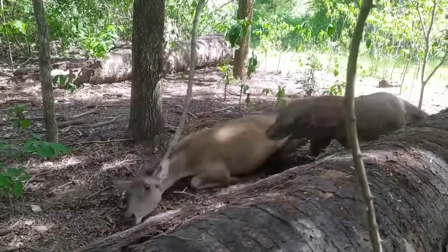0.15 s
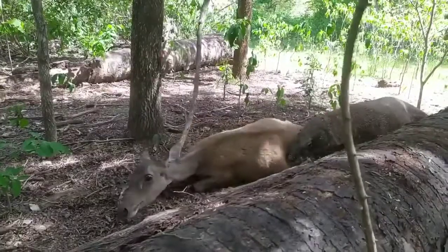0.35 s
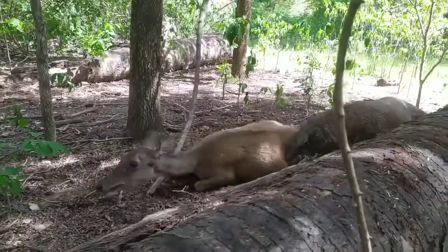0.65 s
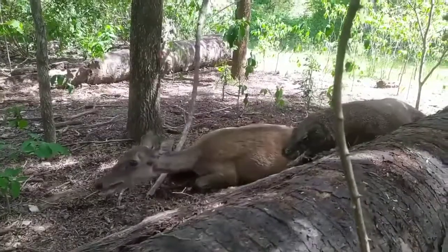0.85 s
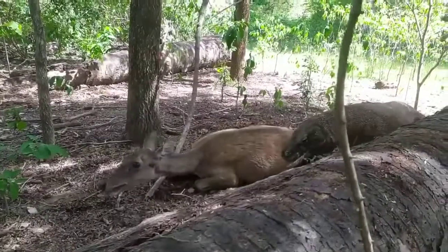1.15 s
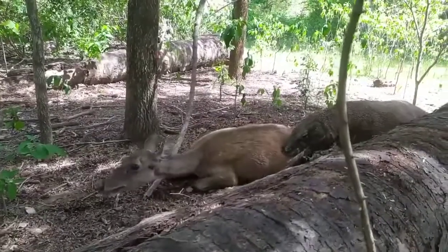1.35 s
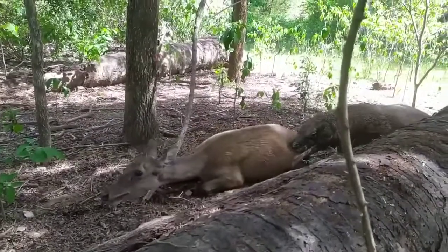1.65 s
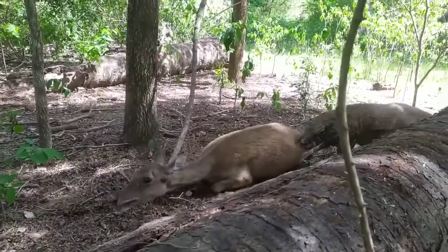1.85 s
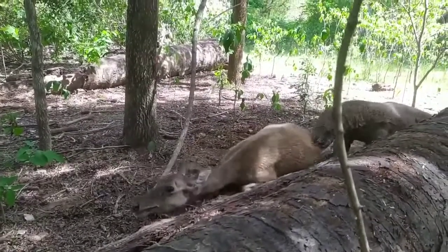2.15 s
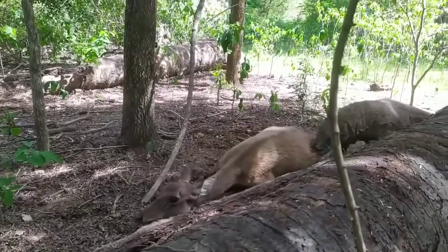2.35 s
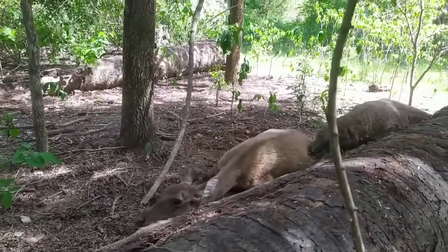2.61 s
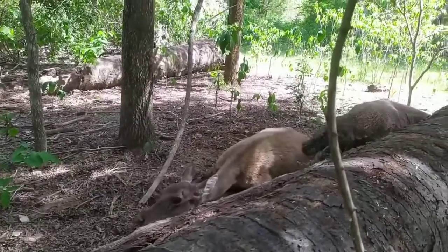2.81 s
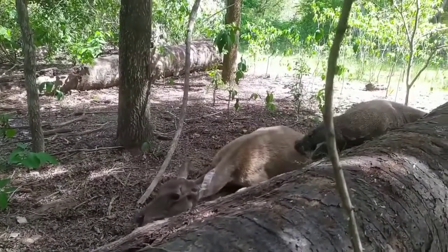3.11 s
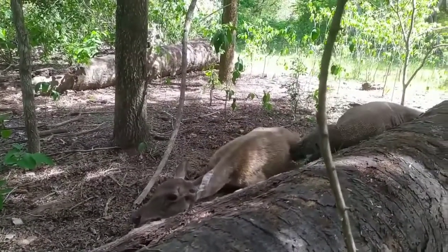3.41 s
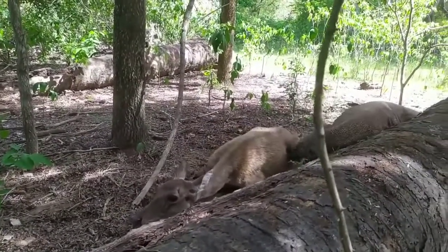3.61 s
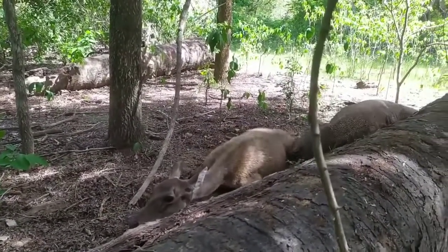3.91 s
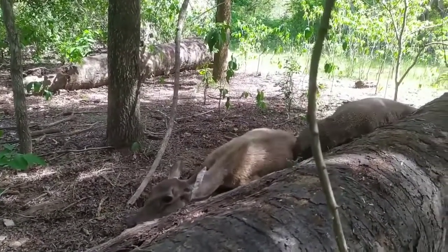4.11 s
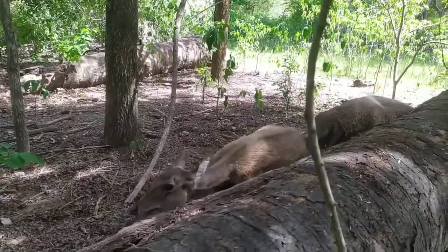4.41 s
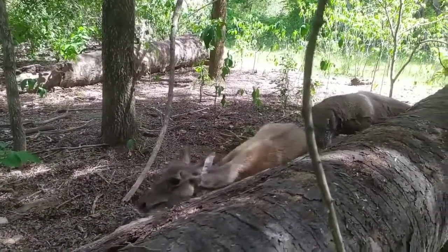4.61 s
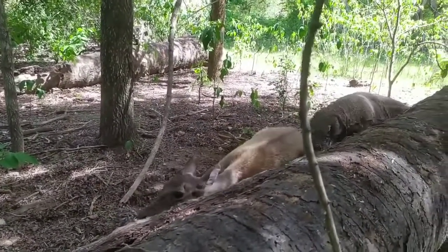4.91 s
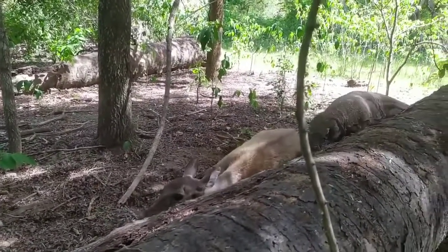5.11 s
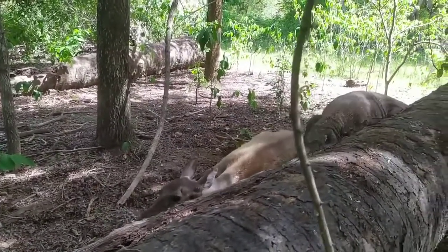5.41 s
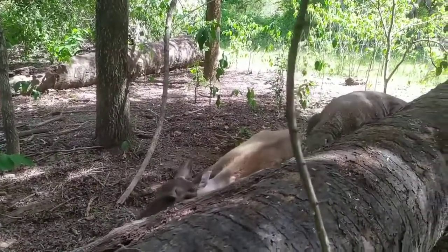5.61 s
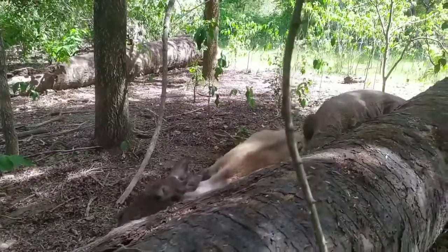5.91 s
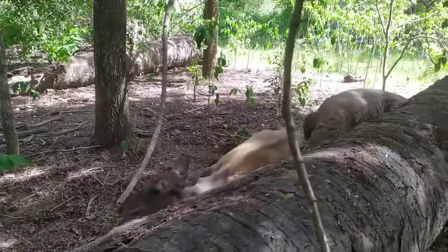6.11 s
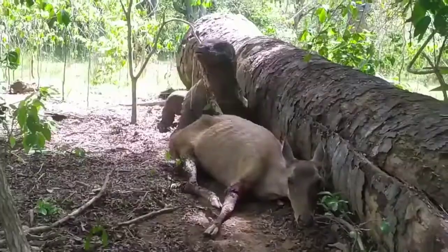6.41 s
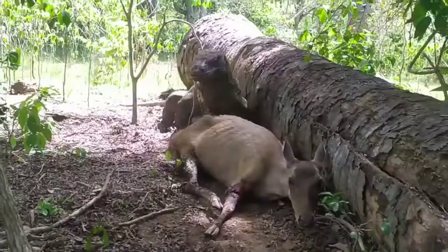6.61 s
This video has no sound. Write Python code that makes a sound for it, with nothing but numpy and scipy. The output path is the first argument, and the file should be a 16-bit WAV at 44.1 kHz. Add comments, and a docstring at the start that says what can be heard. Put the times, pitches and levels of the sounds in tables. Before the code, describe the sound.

A deer bleats once, a growl leaping into a scream and sinking to a rattle, amid leaf rustle, twig snaps and soft thuds in quiet forest.

```python
"""Dry forest: a deer, held down by a large lizard, gives one long bleat, two short grunts and thin wheezes.
The bleat is a pulsed growl, a scream of summed harmonics that leaps in pitch, and a slowing pulsed rattle.
Leaf litter and soil are coloured grainy noise; twigs are noise bursts; thuds are decaying sines and crumbs.
Birds are gliding sines with echoes; a low flutter of throbbing noise and steady air noise lie beneath."""
import sys
import numpy as np
from scipy import signal
from scipy.fft import rfft, irfft, next_fast_len
from scipy.io import wavfile
from scipy.ndimage import uniform_filter1d, map_coordinates

SR = 44100
rng = np.random.default_rng(int(sys.argv[2]) if len(sys.argv) > 2 else 0)


def dump_mix(stems):
    """Bounce the given channels to the path in sys.argv[1] as a 16-bit WAV at rate SR."""
    frames = np.atleast_2d(stems).T  # one column per channel
    limited = np.clip(frames, -1, 1)  # hard clip at full scale
    pcm = np.round(limited * 32767).astype(np.int16)
    wavfile.write(sys.argv[1], SR, pcm)


N = 297675
T = np.arange(N) / SR
CUTOFF_HZ = 15700
PORT_LAG_S = 0.00015
# scream pitch, leaping where the voice breaks: time_s, pitch_hz
SCREAM_PITCH = [(2.565, 374.8), (2.668, 470.7), (2.682, 597), (2.72, 674), (2.772, 748), (2.784, 887),
                (2.81, 966), (2.86, 1057), (2.925, 1081), (2.95, 1107), (3.005, 1132), (3.05, 1114),
                (3.07, 1082), (3.112, 1046), (3.135, 978), (3.165, 928.5), (3.177, 765.6), (3.283, 707)]


def from_db(db):
    """Decibels to amplitude gain."""
    return 10 ** (np.asarray(db) / 20)


def rms_one(x):
    """Scale to unit power."""
    return x / np.sqrt(np.mean(x ** 2) + 1e-20)


def even_level(x, window):
    """Divide by the running RMS over a window in samples."""
    return x / np.sqrt(np.maximum(uniform_filter1d(x ** 2, size=window), 1e-12))


def lowpass(x, hz):
    """Gentle first-order treble cut."""
    return signal.lfilter(*signal.butter(1, hz, fs=SR), x)


def second_order(x, hz, kind):
    """Butterworth high-pass or band-pass, design order 2."""
    return signal.sosfilt(signal.butter(2, hz, kind, fs=SR, output="sos"), x)


def decay(x, time_constant_s):
    """Give each impulse an exponential tail."""
    return signal.lfilter([1], [1, -np.exp(-1 / (time_constant_s * SR))], x + 1e-18)


def in_time(rows, t=T):
    """Interpolate each column of a table linearly against its first, time."""
    s, *columns = np.transpose(rows)
    return [np.interp(t, s, c) for c in columns]


def during(rows):
    """One while a curve lasts, with 6 ms fades inside its ends."""
    return np.clip(np.minimum(T - rows[0][0], rows[-1][0] - T) / .006, 0, 1)


def ramp(start_s, length_s):
    """Straight rise from zero to one."""
    return np.clip((T - start_s) / length_s, 0, 1)


def envelope(start_s, attack_s, hold_s, release_s):
    """Gain of an attack, hold and release, and the share of the release spent."""
    spent = ramp(start_s + attack_s + hold_s, release_s)
    return ramp(start_s, attack_s) * (1 - spent), spent


def at_hz(points, hz):
    """Read a spectrum on a log-frequency axis."""
    f, db = np.transpose(points)
    return np.interp(np.log(hz + 1), np.log(f), db)


def drift(knots_per_s, t=T):
    """Random knots joined by straight lines, about unit spread."""
    knots = rng.standard_normal(int(N / SR * knots_per_s) + 4)
    # interpolation leaves 2/3 of the variance
    return np.interp(t * knots_per_s, np.arange(len(knots)), knots) / np.sqrt(2 / 3)


def colour(x, spectrum):
    """Minimum-phase filter with the given spectrum, falling away below its first point."""
    size = 2 * next_fast_len(N // 2 + 4096)
    hz = np.arange(size // 2 + 1) * SR / size
    gain = from_db(at_hz(spectrum, hz)) * np.clip(hz / spectrum[0][0], .03, 1) ** 2
    # folding the cepstrum makes the response causal
    cepstrum = irfft(np.log(gain))
    cepstrum[1:size // 2] *= 2
    cepstrum[size // 2 + 1:] = 0
    return irfft(rfft(x, size) * np.exp(rfft(cepstrum)))[..., :N]


def ports(x):
    """The sound reaches the right microphone a little before the left."""
    left = np.concatenate([np.zeros(round(PORT_LAG_S * SR)), x])[:N]
    return np.array([left, x])


def pan(left_minus_right_db):
    """Left and right gains for a level difference."""
    return from_db(np.vstack([left_minus_right_db, -left_minus_right_db]) / 2)


def noise(spectrum, apart, grain=0.):
    """Stereo noise of unit power; grain makes it crackle, apart unlinks the two sides in the treble."""
    peaks_db = grain * np.minimum(rng.exponential(1, (3, N)), 7)
    white = rng.standard_normal((3, N)) * from_db(peaks_db)
    own = signal.lfilter(*signal.butter(1, 2500, "high", fs=SR), white[1:])
    return rms_one(colour(ports(white[0]) + apart * own, spectrum))


def deer():
    """One bleat through its three registers, then the grunts and wheezes."""
    return voice_ports(growl() + scream() + rattle() + grunts() + wheezes())


def scream(flutter_db=3.5, shimmer_db=1.44, air_db=-51, slack_air_db=-27):
    """Tight folds give a clean harmonic stack; overtones swell as they cross the throat's resonances."""
    # RMS levels before waver: time_s, fundamental_db, overtones_db, treble_db
    levels = [(2.575, -38, -57.5, -73.5), (2.665, -35, -43, -70), (2.686, -26, -38, -54),
              (2.712, -18, -33, -57), (2.735, -22.5, -32.5, -58), (2.754, -31, -38, -66),
              (2.77, -25, -41, -64), (2.79, -31, -32.5, -56), (2.815, -30, -31, -52),
              (2.89, -30.5, -27, -48), (2.96, -28, -30, -56), (3.02, -25, -26.5, -45.5),
              (3.06, -24.5, -29, -48.5), (3.1, -22.5, -19, -46.5), (3.127, -20, -18, -46),
              (3.137, -16.5, -16.5, -42), (3.16, -16.5, -21.5, -42), (3.188, -12, -14.5, -46),
              (3.22, -13, -16.5, -48.5), (3.258, -18.5, -17, -53), (3.28, -27, -27, -56)]
    # throat and mouth, relative: freq_hz, gain_db
    throat = [(900, 0), (1450, 4.5), (1900, 4.5), (2250, 3.5), (2950, -10.5), (3400, -11), (3700, -24),
              (4000, -22.5), (4500, -13), (5500, -20.5), (6400, -16), (7600, -23), (8650, -17.5),
              (9500, -22.5), (12500, -44)]
    # turbulence, tight folds: freq_hz, gain_db
    tight_air = [(500, -5), (900, -0.5), (1500, -9), (2200, -7), (3500, -21.5), (4500, -17), (6500, -1),
                 (8700, -4.5), (11000, -13), (14000, -33.5)]
    # turbulence, slack folds: freq_hz, gain_db
    slack_air = [(600, -4), (1000, -6), (1500, 0), (2400, -1), (3600, -7), (4100, -22), (8000, -22),
                 (14000, -40)]
    treble_hz, treble_span_hz = 4000, 400
    tighten_s, tighten_span_s = 2.745, .025
    tight_jitter, slack_extra_jitter, quaver = 0.0016, 0.016, .003  # shares of the pitch
    slack_alternation = .4  # share; strong and weak cycles alternate

    gate = during(SCREAM_PITCH)
    on = gate > 0
    t = T[on]
    pitch, strength = breaking_pitch(t)
    first_db, overtone_db, treble_db = in_time(levels, t)
    slack = 1 / (1 + np.exp((t - tighten_s) / tighten_span_s))
    jitter = tight_jitter + slack_extra_jitter * slack
    unsteady = 1 + jitter * drift(900, t) + quaver * drift(110, t)
    phase = 2 * np.pi * np.cumsum(pitch * unsteady) / SR

    k = np.arange(2, 19)[:, None]
    weight = from_db(at_hz(throat, k * pitch)) * (k * pitch < CUTOFF_HZ)
    high = np.clip((k * pitch - treble_hz) / treble_span_hz + .5, 0, 1)
    gains = 0
    for db, w in [(overtone_db, weight * (1 - high)), (treble_db, weight * high)]:
        gains = gains + from_db(db) * w / np.sqrt(np.sum(w ** 2, axis=0) + 1e-6)
    waver_db = np.array([flutter_db * drift(60, t) + shimmer_db * drift(300, t) for _ in k])
    waver_db = waver_db * np.minimum(k / 5, 1)
    strength = strength * (1 + slack_alternation * slack * np.cos(phase / 2))
    overtones = strength * np.sum(gains * from_db(waver_db) * np.sin(k * phase), axis=0)

    voice, air, leak = np.zeros((3, N))
    voice[on] = np.sqrt(2) * (from_db(first_db) * np.sin(phase) + overtones)
    # air puffs out every cycle; slack folds leak a duller rasp
    air[on] = (from_db(first_db) + from_db(overtone_db)) * (1 + np.cos(phase))
    leak[on] = air[on] * slack
    breath = 0
    for db, flow, spectrum in [(air_db, air, tight_air), (slack_air_db, leak, slack_air)]:
        breath = breath + from_db(db) * flow * rms_one(colour(rng.standard_normal(N), spectrum))
    return gate * (voice + breath)


def breaking_pitch(t):
    """The pitch glides, but where it must move fast it stalls, leaps and weakens the overtones."""
    s, hz = np.transpose(SCREAM_PITCH)
    pitch, strength = np.interp(t, s, hz), np.ones(len(t))
    # a break: over 8.5 nepers per s and over 0.1 neper
    breaks = np.abs(np.diff(np.log(hz))) > np.maximum(8.5 * np.diff(s), .1)
    for i in np.flatnonzero(breaks):
        middle = (s[i] + s[i + 1]) / 2
        stepped = np.where(t < middle, hz[i], hz[i + 1])
        pitch = np.where((t > s[i]) & (t < s[i + 1]), stepped, pitch)
        strength *= 1 - .9 * np.exp(-((t - middle) / .004) ** 2)
    return uniform_filter1d(pitch, size=220), strength


def growl(rough=0.42, locked_rough=0.2, ending_rough=0.18):
    """Slow shaking pulses that quicken, then follow every second cycle of the scream."""
    # throat: freq_hz, gain_db
    throat = [(90, -11.5), (170, -32), (280, -13), (400, -5.5), (520, -18), (650, 6.5), (780, -15),
              (1200, -26), (1600, -15), (2100, -30), (2400, -20.5), (3000, -25), (3700, -28.5), (3950, -42),
              (7000, -42.5), (14000, -63.5)]
    start_s, attack_s, lock_s = 2.29, 0.078, 2.575
    start_hz, rise_hz_per_s = 90, 90
    level_db, tremor_hz, tremor_db = -33, 10.9, 1.5
    gain, spent = envelope(start_s, attack_s, hold_s=.305, release_s=0.03)
    age_s, locked = T - start_s, T > lock_s
    free_hz = start_hz + rise_hz_per_s * np.maximum(age_s, 0)
    rate_hz = np.where(locked, in_time(SCREAM_PITCH)[0] / 2, free_hz)
    shake_db = tremor_db * np.cos(2 * np.pi * tremor_hz * (age_s - attack_s))
    roughness = np.where(spent > 0, ending_rough, np.where(locked, locked_rough, rough))
    return pulsed_voice(rate_hz, gain * from_db(level_db + shake_db), roughness, throat,
                        jitter=.15, shimmer_db=2, rasp=1.0, rasp_hz=1090, chest_db=-19.0)


def rattle(burst_rough=0.45, harsh_rough=0.33, ending_rough=.4):
    """The folds go slack: a harsh burst settles into ragged pulses that slow down and run out."""
    # rattle slowing as the jaw works: time_s, pulse_rate_hz, resonance_shift_octaves
    motion = [(3.27, 137, 0.13), (3.33, 133, 0.015), (3.41, 122, -0.046), (3.47, 113, 0.035),
              (3.59, 101.5, -.04), (3.655, 89.5, -0.078), (3.7, 68, -.16)]
    # throat before the shift: freq_hz, gain_db
    throat = [(115, -13.5), (190, -34.5), (300, -13), (410, -18.5), (560, -14.5), (680, -12), (765, 1),
              (870, -12.5), (1050, -17.5), (1450, -7.5), (1750, -10), (1970, -10.5), (2300, -21),
              (2600, -28), (3200, -32), (4200, -43), (5400, -34), (8500, -33), (10000, -41), (11800, -47),
              (13000, -68)]
    start_s, steadies_s, steady_rough = 3.264, 3.43, .1
    level_db, burst_db, burst_s = -27.5, 9, 0.11
    gain, spent = envelope(start_s, attack_s=0.012, hold_s=0.37, release_s=0.046)
    burst = np.exp(-np.clip(T - start_s, 0, 1) / burst_s)
    rate_hz, octaves = in_time(motion)
    harshness = (T < steadies_s) * (harsh_rough + burst_rough * burst)
    roughness = steady_rough + harshness + ending_rough * spent
    voice = pulsed_voice(rate_hz, gain * from_db(level_db + burst_db * burst), roughness, throat,
                         jitter=.055, shimmer_db=3.5, rasp=1.0, rasp_hz=3520, chest_db=-4.0,
                         octaves=octaves * (gain > 0))
    # the mouth closes over the end and muffles it
    closed = ramp(start_s=3.57, length_s=0.23)
    return (1 - closed) * voice + closed * lowpass(voice, 954)


def grunts(release_sag=0.084):
    """Short rough pulsing whose rate sags by a small share as it ends."""
    # grunts: start_s, attack_s, hold_s, release_s, initial_pulse_rate_hz, level_db, roughness (0-1)
    calls = [(5.8, .07, .025, 0.065, 124, -47.5, .55), (6.043, .018, 0.0054, 0.036, 124, -45, 0.2)]
    # throat: freq_hz, gain_db
    throat = [(70, -38.5), (120, 5.5), (250, 1.5), (380, 1), (520, -5.5), (640, -3), (800, -6.5),
              (1100, -7), (1600, -22), (4000, -19.5)]
    out = np.zeros(N)
    for *shape, hz, db, rough in calls:
        gain, spent = envelope(*shape)
        out += pulsed_voice(hz * (1 - release_sag * spent), gain * from_db(db), rough, throat,
                            jitter=0.23, shimmer_db=6.5, rasp=0.73, rasp_hz=1180, chest_db=11.0)
    return out


def wheezes(waver=.06):
    """Air squeezes through the deer's tight throat in thin ragged tones."""
    # wheezes: start_s, length_s, mean_pitch_hz, peak_db
    tones = [(5.798, 0.055, 1145, -47.5), (6.019, 0.023, 1110, -53), (6.06, 0.1, 906, -58.5)]
    out = np.zeros(N)
    for s, length_s, hz, db in tones:
        phase = 2 * np.pi * np.cumsum(hz * (1 + waver * drift(370))) / SR
        out += from_db(db) * np.sin(np.pi * ramp(s, length_s)) * np.sin(phase)
    return out


def pulsed_voice(rate_hz, gain, rough, throat, jitter, shimmer_db, rasp, rasp_hz, chest_db, octaves=0):
    """Slack folds slap unevenly; slaps and air puffs ring in the throat, over a smooth chest tone."""
    # chest hum, before chest_db: pulse_rate_multiple, relative_db
    chest_tones = [(1, -14), (2, -17), (3, -27)]
    cycles = np.cumsum(rate_hz * (1 + jitter * rough * drift(200))) / SR
    slaps = np.diff(np.floor(cycles), prepend=0) * np.sqrt(SR / rate_hz)
    slaps = slaps * from_db(shimmer_db * rough * drift(200))
    puffs = rms_one(rng.standard_normal(N) * (0.53 + np.exp(-6 * (cycles % 1))))
    puffs = second_order(puffs, 300, "high")
    # the treble is mostly turbulence
    source = lowpass(slaps * (1 - rough / 2) + rasp * rough * puffs, rasp_hz)
    source += 0.83 * second_order(puffs, rasp_hz, "high")
    voice = even_level(moving_throat(source, throat, octaves), window=1500)
    chest = sum(from_db(db + chest_db) * np.cos(2 * np.pi * k * cycles) for k, db in chest_tones)
    return (voice + (1 - rough / 2) * chest) * gain


def moving_throat(source, throat, octaves, wander_s=0.0001, wanders_per_s=30):
    """Ring the throat and muzzle with all their resonances shifted, and wavering a little."""
    # warp time, filter, unwarp: the pulses stay put and the resonances move
    clock = np.cumsum(2 ** octaves * np.ones(N)) - 1
    if np.any(octaves):
        warped = np.interp(np.arange(N), clock, np.arange(N))
        source = map_coordinates(source, [warped], order=3)
    ringing = muzzle(colour(source, throat))
    return map_coordinates(ringing, [clock + wander_s * SR * drift(wanders_per_s)], order=3)


def muzzle(x, reflection=0.63, round_trip_s=.0019):
    """Each slap bounces up and down the long muzzle, an all-pass that spreads it in time."""
    loop = np.zeros(round(round_trip_s * SR) + 1)
    loop[0], loop[-1] = 1, reflection
    return signal.lfilter(loop[::-1], loop, x)


def voice_ports(x):
    """The voice arrives at the two microphones out of step, and differently coloured."""
    # right-channel phase lead, bent by the log close by: freq_hz, lead_rad
    phase_lead = [(60, .15), (450, 0.49), (620, 0.71), (760, 1.94), (920, 0.83), (1120, 2.3), (1300, 2.05),
                  (1720, 3.23), (1920, 1.6), (2230, 2.92), (2420, 6), (2650, 8), (2950, 11.1),
                  (3400, 10.85), (4500, 14.5), (6000, 14), (15000, 14.2)]
    # side balance from the same reflection: freq_hz, left_minus_right_db
    balance = [(200, 0), (380, -2), (700, 1.5), (850, -3.5), (1000, 2.5), (1230, -5), (1450, 0), (1650, -5),
               (1850, -7.5), (2000, 0), (2300, 2.5), (2450, -1.5), (2700, 4), (3000, 3), (3700, 0.5)]
    hz = np.arange(N + 1) * SR / (2 * N)
    lead = np.interp(hz, *np.transpose(phase_lead))
    sides = pan(at_hz(balance, hz))
    sides = sides / np.sqrt(np.mean(sides ** 2, axis=0))
    turn = np.array([np.exp(-1j * lead), np.ones(N + 1)])
    return irfft(rfft(x, 2 * N) * sides * turn)[:, :N]


def litter(crackles_per_s=55, clump_db=1.1, crackle_db=1):
    """Dry leaves rustle and crack in clumps while the bodies drag over the soil."""
    # dry leaf rustle: freq_hz, gain_db
    leaf_colour = [(200, -21.5), (500, -10.5), (1000, -15.5), (1800, -11), (2800, -5.5), (4200, -12),
                   (6500, -1.5), (8500, -2.5), (11000, -7), (15000, -22)]
    # bodies dragged over soil: freq_hz, gain_db
    soil_colour = [(100, 8), (220, 3), (380, 1), (480, -5), (660, 1), (820, -5), (1050, -1), (1350, -6),
                   (1600, -3), (1770, -3), (1900, 7), (2060, -1), (2400, -1), (4500, -21), (9000, -30)]
    # rustle shifting left: time_s, left_minus_right_db
    leaf_pan = [(4.0, 2.1), (4.6, 4.5)]
    rustle, drag = struggle()
    # single leaves break, each about a millisecond
    breaks = (rng.random(N) < crackles_per_s / SR) * rng.uniform(.2, 1, N)
    breaks = decay(breaks, 0.00082)
    clumps = from_db(clump_db * drift(70)) + from_db(crackle_db) * breaks
    leaves = rustle * noise(leaf_colour, apart=8.2, grain=2.2) * pan(in_time(leaf_pan)[0])
    soil = drag * noise(soil_colour, apart=1.0, grain=4.1)
    return clumps * (leaves + soil)


def struggle(stir_leaves_db=-66, stir_soil_db=-67, still_s=6.25):
    """Leaf and soil gains: heaves swell and die over a steady stir, until the bodies lie still."""
    # heaves, before clumping: peak_s, rise_s, fall_s, leaves_db, soil_db
    heaves = [(.17, 0.17, 0.2, -46.5, -47), (1.0, 0.24, 0.22, -55.5, -62), (1.68, 0.25, 1, -56, -62),
              (1.988, 0.017, 0.02, -55, -55), (2.35, 0.21, 0.6, -60, -63), (4.24, 0.04, 0.06, -61, -69),
              (4.6, .2, 0.095, -57.5, -66), (4.76, 0.039, .02, -60.5, -72), (5.48, 0.0074, .06, -54.5, -68),
              (5.66, 0.15, 0.07, -54.5, -73.5), (5.98, 0.19, 0.097, -50, -67),
              (6.18, 0.088, 0.029, -51.5, -63.5)]
    stirring = 1 - ramp(still_s, 0.019)
    leaves_power = (stirring * from_db(stir_leaves_db)) ** 2
    soil_power = (stirring * from_db(stir_soil_db)) ** 2
    for s, rise_s, fall_s, leaves_db, soil_db in heaves:
        swell = np.exp(-np.maximum((s - T) / rise_s, (T - s) / fall_s))
        leaves_power = leaves_power + (from_db(leaves_db) * swell) ** 2
        soil_power = soil_power + (from_db(soil_db) * swell) ** 2
    return np.sqrt(leaves_power), np.sqrt(soil_power)


def twigs(boost_db=2.5, body_hz=3000, fibres_per_s=900):
    """A twig cracks once, then its fibres tear in a dying burst."""
    # twigs: start_s, peak_db (before boost and pan), nominal_centre_hz, left_minus_right_db, splintering_s
    snaps = [(0.0972, -38, 8000, 3, 0.01), (.193, -39, 6900, 6, 0.0046), (.357, -43, 7000, 3, .003),
             (0.4286, -35, 10600, 2, 0.008), (1.978, -39, 8800, 0, 0.014), (2.164, -36, 9300, 2, 0.0012),
             (3.893, -52.5, 3500, 5.5, 0.0018), (4.612, -43.5, 8000, 6, 0.0061),
             (4.648, -40.5, 4300, -1, 0.0027), (4.8268, -29.5, 6000, 9, 0.0042),
             (4.832, -32, 5500, 7, .015), (5.0251, -33.5, 5780, 3, 0.0016), (5.035, -39.5, 5570, 6, 0.0033),
             (5.1135, -42, 5130, 6, .001), (5.1299, -28, 7000, 11, 0.00043), (5.6441, -33, 7650, 11, 0.004),
             (5.932, -40.5, 6340, 5, 0.016), (5.9548, -30, 8450, 3, 0.0019),
             (5.984, -36.5, 8100, 7, 0.0024), (6.1686, -42, 7170, 10, 0.006), (6.183, -38, 7500, 10, .002)]
    out, t = np.zeros((2, N)), np.arange(SR // 6) / SR
    for s, db, hz, side_db, splinter_s in snaps:
        fibres = (rng.random(len(t)) < fibres_per_s / SR) * 0.82 * np.exp(-t / splinter_s)
        fibres[0] = 1
        crack = rng.standard_normal((2, len(t))) * decay(fibres, .001)
        band_hz = [hz * 0.73, min(hz * 1.19, 16000)]
        crack = signal.sosfilt(signal.butter(1, band_hz, "band", fs=SR, output="sos"), crack)
        crack = second_order(crack, [body_hz, 13000], "band")
        crack = from_db(db + boost_db) * pan(side_db) * crack / np.abs(crack).max()
        i = round(s * SR)
        out[:, i:i + len(t)] += crack[:, :N - i]
    return out


def thuds(swell_s=0.012, settle_s=0.054, crumbs_per_s=900):
    """The ground gives a few low cycles; contacts knock on dead wood, and loose soil settles."""
    # bodies and hooves on ground: start_s, thud_db, pitch_hz, knock_db, debris_db
    bumps = [(0.168, -42.5, 97, -39, -57), (.19, -47, 120, -47, -67), (.209, -43, 75, -55, -66),
             (0.259, -47, 87, -50, -63), (0.5193, -51, 79.4, -36.5, -52.5), (1.137, -42.5, 69, -62, -75),
             (1.977, -50, 70, -44.5, -61), (1.989, -44.5, 85, -34, -60), (2.127, -53, 106, -50, -69),
             (4.539, -46.5, 90.5, -51, -68), (5.468, -61, 86, -51.5, -58.5), (5.934, -47, 61, -54, -70),
             (6.056, -45, 103, -37, -60)]
    # dead wood under a hoof, before random spread: mode_hz, relative_db, t60_s
    wood_modes = [(217, -1.5, 0.033), (370, 0, 0.024), (620, -1, .016), (1020, -7, 0.011),
                  (1900, -12, .012)]
    out, t = np.zeros(N), np.arange(SR // 4) / SR
    for s, db, hz, knock_db, debris_db in bumps:
        boom = np.sin(2 * np.pi * hz * t) * t / swell_s * np.exp(1 - t / swell_s)
        knock = np.zeros(len(t))
        for mode_hz, mode_db, t60_s in wood_modes:
            ring_db = mode_db + rng.normal(0, 2.2) - 60 * t / t60_s
            knock += from_db(ring_db) * np.sin(2 * np.pi * mode_hz * rng.uniform(0.91, 1.12) * t)
        knock /= np.abs(knock).max()
        crumbs = rng.standard_normal(len(t)) * (rng.random(len(t)) < crumbs_per_s / SR)
        debris = rms_one(second_order(crumbs, (380, 850), "band")) * np.exp(-t / settle_s)
        bump = from_db(db) * boom + from_db(knock_db) * knock + from_db(debris_db) * debris
        i = round(s * SR)
        out[i:i + len(t)] += bump[:N - i]
    return ports(out)


def hiss(level_db=-49.5):
    """A short coloured-noise hiss ahead of the grunts, stronger at the left."""
    # hiss: freq_hz, gain_db
    hiss_colour = [(300, -12), (600, -2), (1100, -2.5), (1400, 4.5), (2000, 1.5), (2500, 5), (3300, 4.5),
                   (4000, -7), (6500, -2.5), (9000, -10), (14000, -29)]
    gain, _ = envelope(start_s=5.48, attack_s=0.042, hold_s=0.12, release_s=0.052)
    return from_db(level_db) * gain * noise(hiss_colour, apart=1.0) * pan(6.0)


def swish(level_db=-62, band_hz=(4900, 6100)):
    """A soft, narrow, high swish in the leaves: band-passed noise."""
    band = second_order(rng.standard_normal((2, N)), band_hz, "band")
    gain, _ = envelope(start_s=3.92, attack_s=.07, hold_s=.04, release_s=.11)
    return from_db(level_db) * gain * rms_one(band)


def birds(waver=0.006, echo_db=-7):
    """Thin whistles and chirps are gliding sines, blurred by the trees between."""
    # far bird's two calls: start_s, level_db
    far_calls = [(1.069, -61), (5.085, -61)]
    # its yodel with one dip: time_from_start_s, pitch_hz
    whistle = [(0, 865), (.07, 899), (.08, 1088), (.115, 1027), (.126, 925), (.138, 881), (.146, 1040),
               (.195, 1058), (.255, 1015), (.28, 937)]
    # small bird's arched chirps: start_s, length_s, start_hz, middle_hz, end_hz, level_db
    chirps = [(6.483, 0.076, 4700, 4970, 3600, -68), (6.553, 0.071, 5000, 5100, 4930, -68.5),
              (6.615, .16, 3630, 4450, 3930, -65.5)]
    notes = []
    for s, db in far_calls:
        gain, _ = envelope(s, attack_s=0.031, hold_s=0.238, release_s=.03)
        notes.append((in_time(whistle, T - s)[0], from_db(db) * gain))
    for s, length_s, *arch_hz, db in chirps:
        along = ramp(s, length_s)
        pitch = np.interp(along, [0, .5, 1], arch_hz)
        notes.append((pitch, from_db(db) * np.sin(np.pi * along)))
    unsteady = 1 + waver * drift(250)
    out = np.zeros(N)
    for pitch, gain in notes:
        out += np.sqrt(2) * gain * np.sin(2 * np.pi * np.cumsum(pitch * unsteady) / SR)
    direct = np.array([out, out])
    return direct + from_db(echo_db) * forest(direct, t60_s=0.43)


def flutter(start_cycle=0.58, fade=1.7, rise=0.39):
    """A low rumble that throbs evenly, each throb quick to rise and slower to sink."""
    # level: time_s, level_db
    levels = [(0, -58), (6.2, -60), (6.75, -66)]
    # rumble before levelling: freq_hz, gain_db
    rumble_colour = [(25, -31.5), (45, -18), (62, 9.5), (90, 4.5), (125, -3), (170, -10.5), (260, -24.5),
                     (600, -45)]
    db, = in_time(levels)
    rate_hz = np.interp(T, [4.6, 5.2], [13.55, 13.9])
    cycle = (np.cumsum(rate_hz) / SR + start_cycle) % 1
    throb = 0.14 + np.minimum(cycle / rise, 1) * np.exp(-fade * cycle) * (1 - cycle ** 4)
    rumble = even_level(colour(rng.standard_normal(N), rumble_colour), window=900)
    return ports(from_db(db) * rms_one(rumble * throb))


def forest(x, t60_s):
    """Trunks and ground scatter a short train of dull echoes, different at each ear."""
    t = np.arange(SR // 3) / SR
    sparse = (rng.random((2, len(t))) < 900 / SR) * (t > .003)
    echoes = rng.standard_normal((2, len(t))) * sparse * from_db(-60 * t / t60_s)
    echoes = signal.lfilter([1], [1, -.5], echoes)
    echoes /= np.sqrt(np.sum(echoes ** 2, axis=1, keepdims=True))
    return signal.fftconvolve(x, echoes, axes=1)[:, :N]


def still_air(level_db=-61.5):
    """The quiet of the still forest: steady coloured noise."""
    # air: freq_hz, gain_db
    air_colour = [(40, -2.5), (60, 1), (120, -1), (200, -5.5), (400, -10), (700, -13), (2000, -22.5),
                  (3000, -25), (4200, -26), (6500, -27), (10000, -32), (15500, -39.5)]
    return from_db(level_db) * noise(air_colour, apart=4.2)


def scene():
    """The struggle among the trees, over the quiet of the forest."""
    voice, snaps = deer(), twigs()
    echoes = from_db(-19) * forest(voice, t60_s=.13) + from_db(-8.5) * forest(snaps, t60_s=0.17)
    ground = litter() + snaps + thuds() + hiss() + swish()
    return voice + ground + echoes + birds() + flutter() + still_air()


def record(dry):
    """A steep elliptic low-pass cuts the top."""
    return signal.sosfilt(signal.ellip(10, .2, 90, CUTOFF_HZ, fs=SR, output="sos"), dry)


dry = scene()
out = record(dry)
dump_mix(out)
```